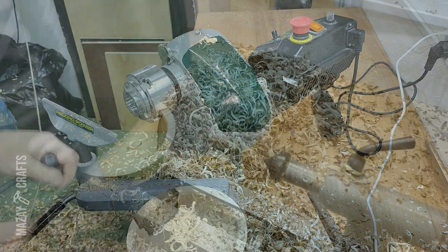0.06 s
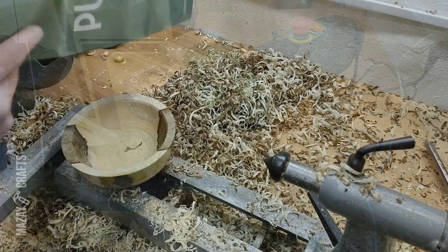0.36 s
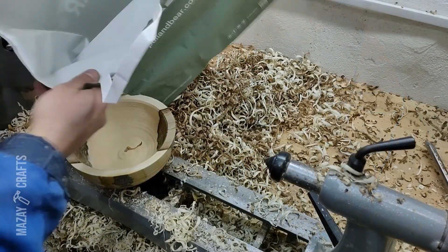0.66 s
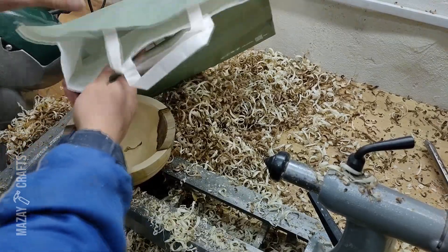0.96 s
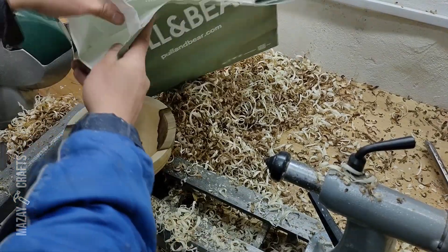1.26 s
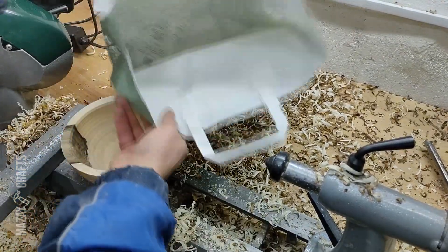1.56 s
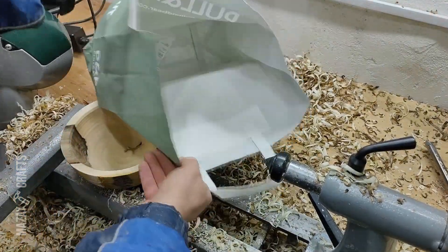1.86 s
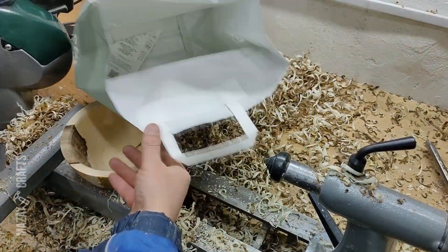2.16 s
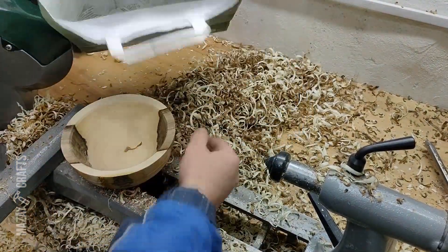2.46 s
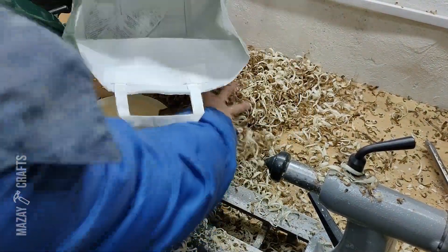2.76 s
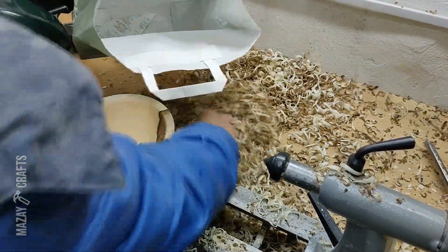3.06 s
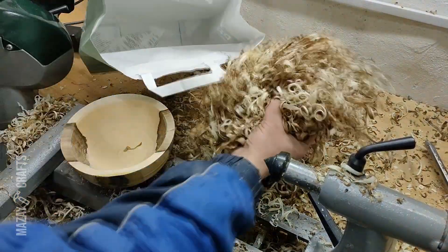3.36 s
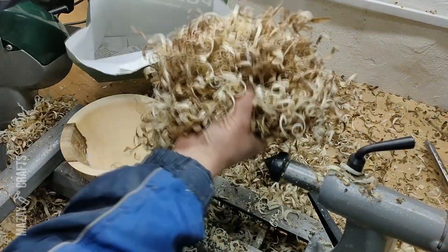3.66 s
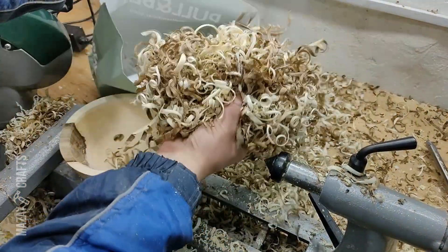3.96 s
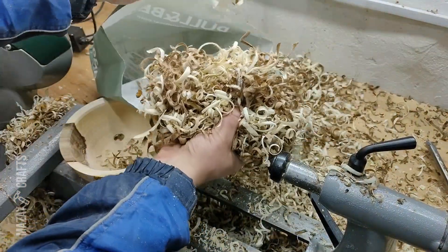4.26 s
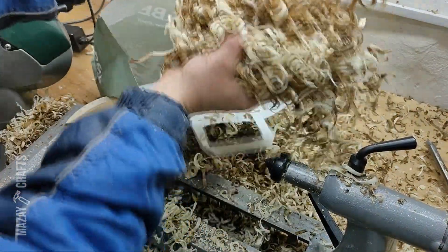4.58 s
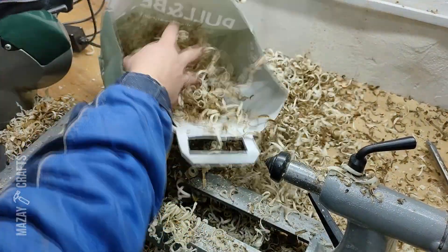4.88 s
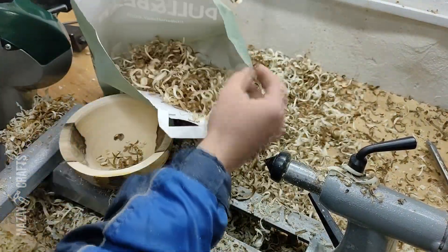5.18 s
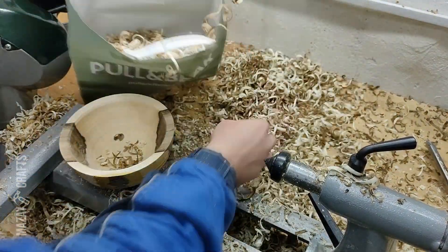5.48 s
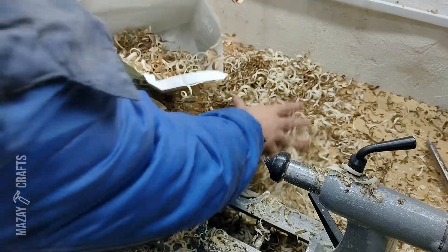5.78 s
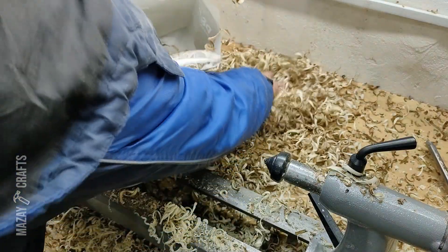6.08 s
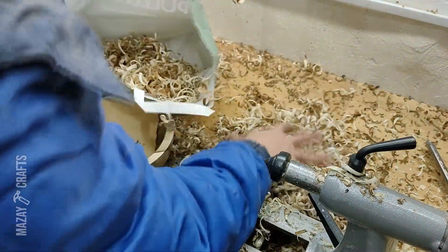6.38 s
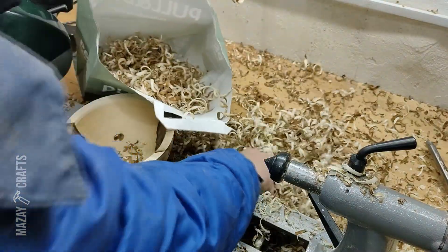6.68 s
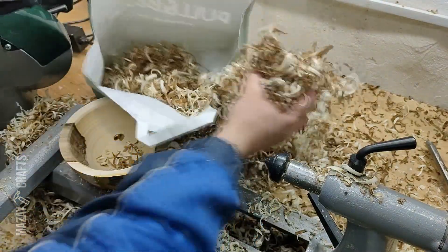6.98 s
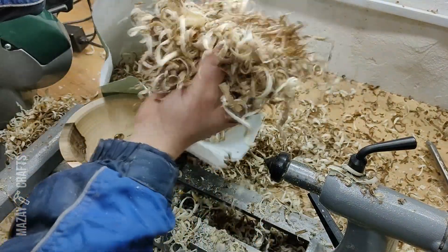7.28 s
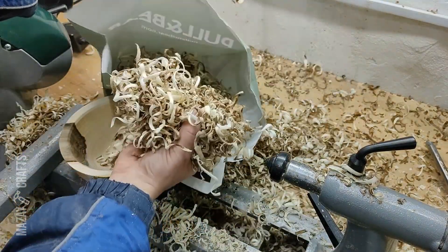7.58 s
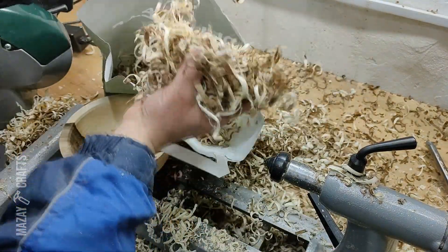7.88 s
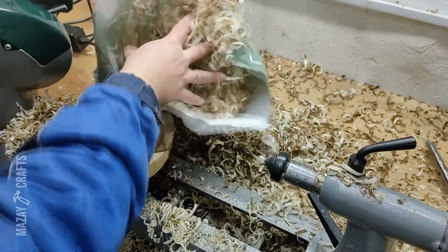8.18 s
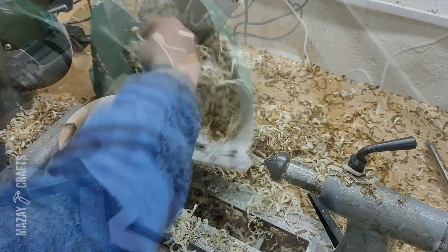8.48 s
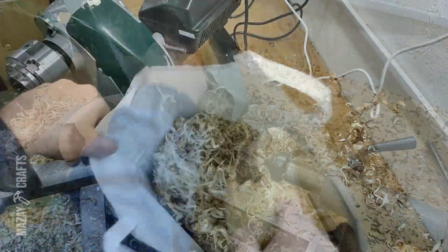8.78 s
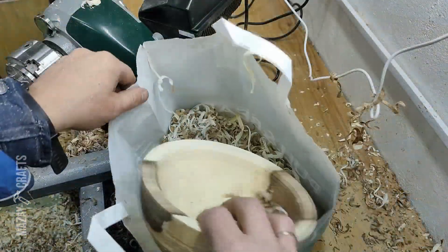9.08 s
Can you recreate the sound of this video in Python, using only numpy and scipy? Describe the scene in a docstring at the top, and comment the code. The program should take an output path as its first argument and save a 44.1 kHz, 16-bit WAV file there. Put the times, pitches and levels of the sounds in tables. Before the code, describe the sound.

A stiff paper bag is handled close to the microphone in a small workshop with a brief echo. It rustles and creases lightly at first, with a hollow knock at 0.6 seconds. From 1.3 to 2 seconds it swings open with louder crumpling, hollow pops and low puffs of air on the right. A sharp snap comes at 2.3 seconds. Around 3 seconds dry wood shavings are swept together with a crisp, fizzing rustle and two soft knocks, followed by quieter stirring. At 4.8 seconds a handful goes into the bag with a loud crumple and hiss. Paper crinkles near 5.5 seconds, and more shavings are swept up from 6 to 7. At 7 seconds the bag bumps the bench with a hollow boom, then crackles. From 8.2 to 9 seconds more shavings are stuffed in, with crunching, sliding paper and light knocks.

```python
"""Bagging wood shavings

Dry wood shavings are swept together on a workshop bench and stuffed by the handful into a stiff
paper bag. The curls fizz with countless tiny fractures. The bag crumples, creases and booms hollowly,
and as it swings open it fans air onto the right microphone. A small room rings briefly behind it all."""
import sys
import numpy as np
from scipy import signal
from scipy.fft import rfft, irfft
from scipy.io import wavfile
from scipy.ndimage import uniform_filter1d

SR = 44100
rng = np.random.default_rng(int(sys.argv[2]) if len(sys.argv) > 2 else 0)


def generate_wav(signal):
    """Clip the signal to [-1, 1] and save it as 16-bit WAV at the path in sys.argv[1]."""
    frames = np.transpose(np.atleast_2d(signal))
    scaled = np.clip(frames, -1, 1) * 32767
    pcm = np.round(scaled).astype(np.int16)
    wavfile.write(sys.argv[1], SR, pcm)


N = 403074
T = np.arange(N) / SR
HZ = np.maximum(np.arange(N // 2 + 1) * SR / N, 1)


def undb(db):
    """Turn decibels into a gain."""
    return 10 ** (np.asarray(db) / 20)


def unit(x):
    """Scale to an average power of 1."""
    return x / np.sqrt(np.mean(x ** 2))


def shape(points):
    """Join (Hz, dB) points into a gain for every frequency."""
    hz, db = np.transpose(points)
    return undb(np.interp(np.log(HZ), np.log(hz), db))


def ring(x, response):
    """Make every sample of x set off the given ringing."""
    return signal.oaconvolve(np.atleast_2d(x), response, axes=-1)[:, :N]


def colour(x, gain):
    """Change the tone with a filter that never rings ahead of a sound, so attacks stay sharp."""
    cepstrum = irfft(np.log(gain), N)
    cepstrum[1:N // 2] *= 2
    cepstrum[N // 2 + 1:] = 0
    response = irfft(np.exp(rfft(cepstrum)), N)[:SR // 20]
    return ring(x, response[None])


def place(sounds):
    """Lay (start in seconds, sound) pairs on one stereo track."""
    track = np.zeros((2, N))
    for s, sound in sounds:
        start = int(s * SR)
        track[:, start:start + sound.shape[1]] += sound[:, :N - start]
    return track


def hiss(seconds, peak_hz=1000, lift_db=0, octaves=1, alike_hz=900):
    """Noise with an optional peak; left and right are alike in the bass, unrelated in the treble."""
    size = int(SR * seconds) + 20
    hz = np.maximum(np.arange(size // 2 + 1) * SR / size, 1)
    white = np.random.default_rng(rng.integers(N)).standard_normal((size, 2))
    mid, side = rfft(white.T)
    alike = 1 / (1 + (hz / alike_hz) ** 2)
    pair = mid * np.sqrt((1 + alike) / 2) + np.array([[1], [-1]]) * side * np.sqrt((1 - alike) / 2)
    peak_db = lift_db * np.exp(-(np.log2(hz / peak_hz) / octaves) ** 2)
    return irfft(pair * undb(peak_db), size)


def burst(fade_s, **resonance):
    """Hiss that starts at once and dies away. A fade time is how long a drop of 60 dB takes."""
    noise = hiss(fade_s, **resonance)
    return noise * np.exp(-np.log(1000) * np.linspace(0, 1, noise.shape[1]))


def wander(per_second):
    """A smooth random drift, roughly between -1 and 1."""
    hold = int(SR / per_second)
    steps = np.repeat(rng.standard_normal(N // hold + 1), hold)
    return 1.2 * uniform_filter1d(steps, hold)[:N]


def crackle(per_second, spread_db, fade_s, clump_db, clump_hz, facet_count=20):
    """Tiny fractures come in clumps; each lands on a small facet with its own brief ring."""
    moments = np.flatnonzero(rng.random(N) < per_second / SR)
    sizes = undb(spread_db * np.clip(rng.standard_normal(len(moments)), -2, 2))
    sizes *= rng.choice([-1, 1], len(moments))
    sizes /= np.sqrt(per_second[moments])  # more fractures sound denser, not louder
    facets = rng.integers(facet_count, size=len(moments))
    out = 0
    for facet in range(facet_count):
        clicks = np.bincount(moments, sizes * (facets == facet), N)
        clicks *= undb(clump_db * wander(clump_hz))
        facet_ring = unit(burst(fade_s * 2 ** rng.uniform(-1.3, 1)))
        out = out + ring(clicks, facet_ring)
    return np.array([unit(channel) for channel in out])


def flex(x, depth_db):
    """A bending sheet keeps changing how it rings: random peaks and dips come and go in its tone."""
    frames = signal.stft(x, nperseg=512)[2]
    patches = uniform_filter1d(rng.standard_normal(frames.shape[1:]), size=4, axis=0)  # over pitch
    patches = uniform_filter1d(patches, size=6, axis=1)  # over time
    gain = unit(undb(depth_db * unit(patches)))
    return signal.istft(frames * gain)[1][:, :N]


# Pushes and shakes of the bag. Each row: start in seconds, level in dB, seconds until it starts
# to settle, change that the hollow bag makes to the low notes in dB.
BAG_PUSHES = [(0.0, -58, 0.13, 5), (0.276, -56, 0.14, 0.5), (0.604, -53, 0.045, 6.5),
              (0.778, -58, 0.24, 0.5), (1.198, -60, .13, -1), (1.332, -52, 0.098, -3),
              (1.471, -47, 0.083, 3), (1.745, -44, 0.039, -0.5), (2.272, -56, 0.034, -0.5),
              (2.381, -60, 0.17, -0.5), (2.781, -67, 0.14, 2), (2.901, -59, 0.17, -1),
              (3.321, -66, 0.19, -15), (4.038, -68, 0.16, 1), (4.348, -59, 0.081, -1.5),
              (4.556, -64, 0.07, -2.5), (4.733, -60, 0.071, 4), (4.813, -37, 0.135, -4.5),
              (5.392, -62, 0.11, 1.5), (5.567, -56.5, 0.093, 0), (5.82, -59, 0.15, -1.5),
              (6.622, -58, 0.11, -2.5), (6.909, -57, .11, 0.5), (7.023, -44, 0.054, 3.5),
              (7.21, -58, 0.2, 4), (7.488, -51.5, .11, 1.5), (7.749, -68, .12, 0.5),
              (7.996, -64, 0.047, -3), (8.187, -40.5, 0.17, -8), (8.481, -49, .12, 4),
              (8.598, -43.5, .055, -2), (8.753, -46, 0.11, -3.5), (8.973, -52, .14, -2)]


def pushes(attack_s=0.022, settle_db_per_s=100, rest_db=-80):
    """Paper gives way, crumples while held, then settles. Returns its power and that of its low notes."""
    power = low_power = undb(rest_db) ** 2  # held paper is never quite still
    for start, db, hold, hollow_db in BAG_PUSHES:
        age = T - start
        attack = np.clip(age / attack_s, 0, 1)
        push = attack * undb(db - settle_db_per_s * np.maximum(age - hold, 0))
        power = power + push ** 2
        low_power = low_power + (push * undb(hollow_db)) ** 2
    return power, low_power


# The tone of stiff paper. Each row: frequency in Hz, gain in dB.
PAPER_TONE = [(30, -22.5), (110, 9.5), (190, 18.5), (430, 19), (1000, 12), (2300, 8.5), (3500, 3.5),
              (5000, -5), (6800, -.5), (10000, -11.5), (15000, -14.5)]


def crumple(effort, hollow_gain):
    """Stiff paper crumples in fits; the air inside the bag changes how strong the low notes are."""
    per_second = 9000 * np.sqrt(effort / effort.max())  # a hard push breaks more folds at once
    folds = crackle(per_second, spread_db=3, fade_s=0.015, clump_db=2.5, clump_hz=25)
    paper = colour(flex(folds, depth_db=3.5) * effort, shape(PAPER_TONE))
    lows = signal.sosfiltfilt(signal.butter(2, 600, fs=SR, output="sos"), paper)
    return paper + lows * (hollow_gain - 1)


# Dull bumps of hand and bag on the bench.
# Each row: start in seconds, level in dB, strongest frequency in Hz, fade time in seconds.
BENCH_BUMPS = [(0.0, -58.5, 100, 0.2), (7.035, -34, 355, .14), (7.072, -43.5, 145.9, 0.52)]
# The notes the bag booms with. Each row: pitch in Hz, relative level in dB, fade time in seconds.
BOOM_NOTES = [(91.4, -8, 0.45), (132.4, 3.5, 0.089), (172, -16, 0.072), (265, -6, 0.16), (342.8, 0, 0.049)]


def bumps():
    """Soft scraping pushes ring the bag on the bench; the lowest note lasts longest, so the boom sinks."""
    scrapes = place((s, undb(db) * burst(fade_s, peak_hz=hz, lift_db=15))
                    for s, db, hz, fade_s in BENCH_BUMPS)
    t = T[:SR]
    notes = sum(undb(db) * np.sin(2 * np.pi * hz * t) * np.exp(-np.log(1000) * t / fade_s)
                for hz, db, fade_s in BOOM_NOTES)
    boom = ring(scrapes, notes[None] / np.linalg.norm(notes))
    return signal.sosfilt(signal.butter(2, 80, "high", fs=SR, output="sos"), boom)


# Swells of bright hiss from shavings being swept or fingers sliding on the paper.
# Each row: loudest moment in seconds, level in dB, seconds to rise by 20 dB, seconds to fall by 20 dB.
HISS_SWELLS = [(0.11, -59, 0.43, 0.3), (0.35, -64, .1, 0.27), (0.89, -60, 0.39, 0.33),
               (1.255, -51, .035, .07), (1.59, -53, 0.26, .15), (1.84, -55, .16, 0.18),
               (2.6, -64, 0.43, .12), (3.02, -53, .27, 0.34), (3.36, -59, 0.082, 0.48),
               (4.12, -74, .18, 0.36), (4.42, -72, 0.14, 0.62), (4.93, -44, .15, 0.24),
               (5.86, -60, 0.33, 0.51), (6.22, -46, 0.25, 0.2), (6.70, -52, .26, .27),
               (7.11, -54, 0.43, 0.16), (7.52, -60, 0.31, 0.37), (8.21, -47, 0.041, .34),
               (8.625, -45, .025, .14), (8.839, -51, .23, 0.068), (9.01, -60, 0.05, 0.38)]


def swells(rest_db=-88):
    """Each swell of hiss grows to its peak, then dies down. Returns their combined power."""
    power = undb(rest_db) ** 2  # held curls are never quite still
    for peak, db, rise, fall in HISS_SWELLS:
        drop_db = 20 * np.maximum((peak - T) / rise, (T - peak) / fall)
        power = power + undb(db - drop_db) ** 2
    return power


# The tone of dry wood curls. Each row: frequency in Hz, gain in dB.
CURL_TONE = [(40, -4), (130, 17), (400, 13), (2000, 9), (3600, 8), (5100, 1.5), (6900, 10.5), (9000, 3.5),
             (12000, 0.5), (14800, 4)]


def shavings(stir):
    """Thin dry curls rub and break: the harder they are stirred, the smoother their ticks fizz."""
    per_second = 24000 * np.sqrt(stir / stir.max())
    fizz = crackle(per_second, spread_db=2.5, fade_s=0.0082, clump_db=3.5, clump_hz=24)
    return colour(flex(fizz, depth_db=1.8) * stir, shape(CURL_TONE))


def panel_tone(x, low_hz=487):
    """One panel of the bag sounds like paper, but is too small to give off much bass."""
    return colour(x, shape(PAPER_TONE) * HZ / np.hypot(HZ, low_hz))


# Creases giving way. Each row: start in seconds, level in dB, pitch of the ringing panel in Hz.
PAPER_CREASES = [(0.111, -50, 2820), (0.288, -52.5, 1480), (0.359, -52, 2200), (0.382, -49.5, 1400),
                 (0.609, -47, 3520), (0.626, -45, 670), (0.674, -49.5, 1260), (0.781, -46.5, 1008),
                 (1.203, -42, 1390), (1.459, -42, 1077), (1.521, -42.5, 718), (1.756, -41.5, 734),
                 (1.802, -43, 1110), (1.853, -45, 1500), (2.102, -61, 918), (2.282, -51.5, 1500),
                 (2.424, -50.5, 975), (4.135, -54.5, 941), (4.326, -57.5, 2500), (4.356, -59, 1662),
                 (4.598, -57.5, 2200), (4.738, -58, 2400), (4.803, -44, 1496), (4.830, -37.5, 1305),
                 (5.260, -55.5, 2802), (5.401, -55.5, 450.3), (5.432, -48, 1402), (5.574, -51.5, 449),
                 (5.612, -44.5, 800), (6.845, -51.5, 1292), (7.015, -39.5, 1131), (7.218, -42.5, 1974),
                 (7.345, -50.5, 639.3), (7.496, -45.5, 1296), (7.720, -58.5, 1000), (8.204, -46, 2497),
                 (8.867, -43, 893.4)]


def creases(rise_s=0.0004):
    """Each fold gives way within a millisecond or two, and its panel rattles on."""
    sounds = []
    for s, db, hz in PAPER_CREASES:
        rattle = burst(0.1, peak_hz=hz, lift_db=7.5, octaves=0.45)
        attack = 1 - np.exp(-T[:rattle.shape[1]] / rise_s)
        sounds.append((s, undb(db) * rattle * attack))
    return panel_tone(place(sounds))


# Paper sliding. Each row: start in seconds, level in dB, pitch of the panel in Hz, length in seconds.
PAPER_RUBS = [(0.301, -62.5, 1920, 0.14), (0.862, -63.5, 740, 0.2), (2.103, -67.5, 2508, 0.06),
              (4.849, -59, 660, 0.4), (4.90, -50, 425.9, 0.22), (8.524, -43, 772, 0.13)]


def rubs():
    """Paper slides past hands and bench with a hiss that rises and falls."""
    sounds = []
    for s, db, hz, length in PAPER_RUBS:
        friction = hiss(length, peak_hz=hz, lift_db=12.5, octaves=0.27)
        arch = np.sin(np.linspace(0, np.pi, friction.shape[1]))
        sounds.append((s, undb(db) * friction * arch))
    return panel_tone(place(sounds))


# Hollow knocks of the bag; close ones push their air into the right microphone.
# Each row: start in seconds, level on the right in dB, starting pitch in Hz, left minus right in dB.
BAG_KNOCKS = [(0.625, -31.5, 215.6, 0), (1.349, -27.5, 243, -28), (1.484, -26, 217, -18),
              (1.503, -18.5, 166.4, -20), (1.568, -21, 219, -18), (1.743, -16.5, 204.3, -25),
              (1.774, -17.5, 159.4, -20), (1.918, -28, 204.8, -20), (2.985, -36.5, 137.4, 1),
              (3.042, -34, 150, 0), (7.035, -24, 359.5, -3), (8.212, -33.5, 275.2, 2.5),
              (8.684, -30.5, 203.5, 0)]


def knocks(cycles=23, pitch_sag=0.234, rise_share=0.062, overtone_ratio=1.9, overtone_db=-11):
    """A side of the bag pops over: a low note and a weaker overtone sag as the paper slackens."""
    sounds = []
    for s, db, hz, left_db in BAG_KNOCKS:
        fade_s = cycles / hz
        progress = T[:int(SR * fade_s)] / fade_s
        turns = hz * np.cumsum(1 - pitch_sag * progress) / SR + rng.random()
        phase = 2 * np.pi * turns
        note = np.sin(phase) + undb(overtone_db) * np.sin(overtone_ratio * phase)
        envelope = (1 - np.exp(-progress / rise_share)) * np.exp(-np.log(1000) * progress)
        sounds.append((s, undb([[db + left_db], [db]]) * note * envelope))
    return place(sounds)


# Puffs of air from the swinging bag. Each row: start in seconds, level in dB, fade time in seconds.
AIR_PUFFS = [(1.333, -39.5, 0.49), (1.485, -28, 0.43), (1.738, -29.5, 0.25), (1.785, -28, 0.26)]
# The rumbling tone of that air. Each row: frequency in Hz, gain in dB.
AIR_TONE = [(20, -2), (90, 26), (190, 26.5), (350, 18), (1200, -21), (8000, -75)]


def puffs(left_db=-26):
    """Swirls of air buffet the right microphone and hardly reach the left."""
    swirls = place((s, undb(db) * burst(fade_s)) for s, db, fade_s in AIR_PUFFS)
    return colour(swirls, shape(AIR_TONE)) * undb([[left_db], [0]])


# Sharp snaps. Each row: start in seconds, level in dB, pitch in Hz, fade time in seconds.
SHARP_SNAPS = [(2.277, -51, 4916, 0.027), (2.2826, -38, 5550, 0.016), (2.283, -63, 7160, 0.093),
               (5.572, -61, 9000, 0.011)]


def snaps():
    """A stiff paper edge or a dry chip breaks with one bright crack."""
    return place((s, undb(db) * burst(fade_s, peak_hz=hz, lift_db=15, octaves=1.1))
                 for s, db, hz, fade_s in SHARP_SNAPS)


def room(x, fade_s=0.36, echo_db=-9):
    """Walls and bench add a short wash of echoes, fullest in the lower middle notes."""
    tail = burst(fade_s, peak_hz=464, lift_db=3.5, octaves=5.1)
    tail = np.pad(tail, ((0, 0), (SR // 200, 0)))  # the echoes arrive 5 ms late
    tail /= np.linalg.norm(tail, axis=1, keepdims=True)
    return x + undb(echo_db) * ring(x, tail)


# The faint steady noise of the room. Each row: frequency in Hz, gain in dB.
ROOM_NOISE_TONE = [(150, -58), (500, -76), (8000, -99)]


def scene(brush_db=-10, stir_db=-21):
    """Bag and shavings sound in the room; knocks, puffs and room noise are added without echo."""
    pushing, low_pushing = pushes()
    swelling = swells()
    brushing = swelling * undb(brush_db) ** 2  # the paper rustles along with each swell
    effort = np.sqrt(pushing + brushing)
    hollow_gain = np.sqrt(low_pushing + brushing) / effort
    stir = np.sqrt(swelling + pushing * undb(stir_db) ** 2)  # a push also stirs the shavings
    bag = crumple(effort, hollow_gain) + creases() + rubs()
    handling = room(bag + shavings(stir) + snaps() + bumps()) + knocks() + puffs()
    room_noise = colour(rng.standard_normal((2, N)), shape(ROOM_NOISE_TONE))
    return handling + room_noise


# How much brighter the left microphone is. Each row: frequency in Hz, left minus right in dB.
LEFT_BRIGHTNESS = [(400, .3), (1300, 1.3), (8000, 2.3), (15000, 7)]


def record(dry):
    """The left microphone hears more treble than the right, and the very top is cut from both."""
    tilt = np.sqrt(shape(LEFT_BRIGHTNESS))
    stereo = np.vstack([colour(dry[0], tilt), colour(dry[1], 1 / tilt)])
    top_cut = signal.ellip(10, 0.2, 70, 15850, fs=SR, output="sos")
    return signal.sosfilt(top_cut, stereo)


dry = scene()
out = record(dry)
generate_wav(out)
```